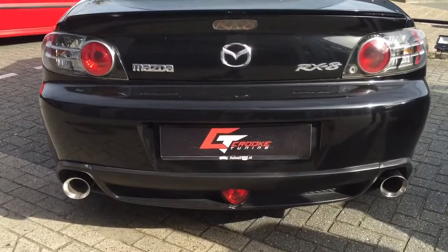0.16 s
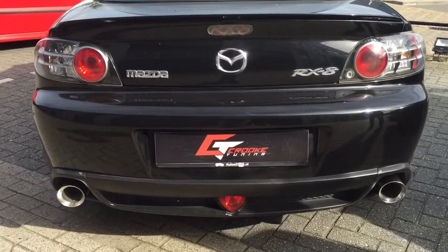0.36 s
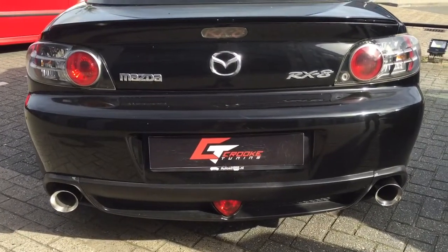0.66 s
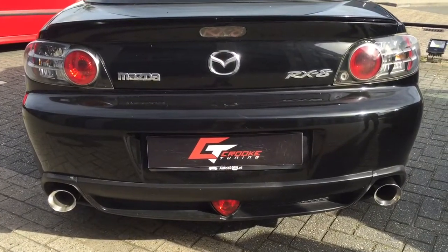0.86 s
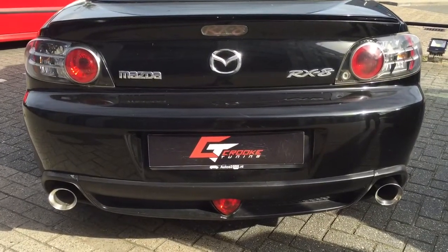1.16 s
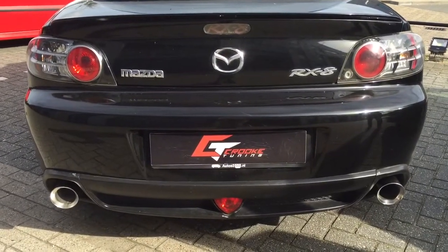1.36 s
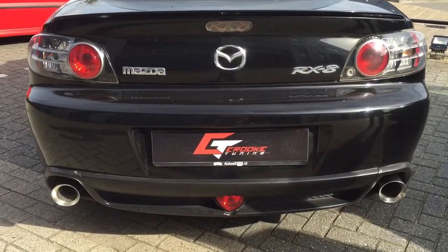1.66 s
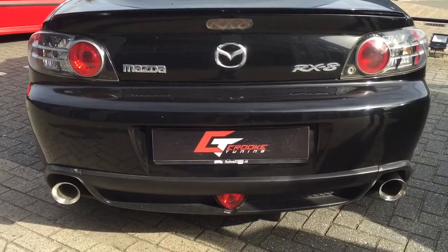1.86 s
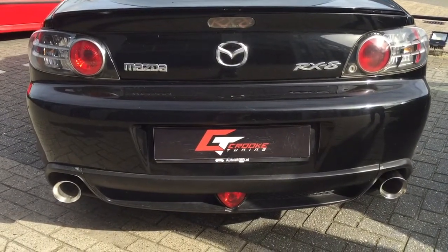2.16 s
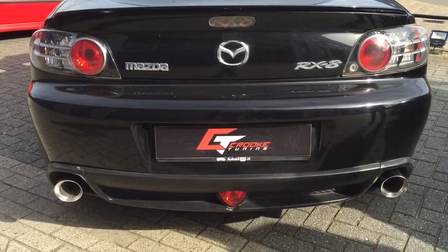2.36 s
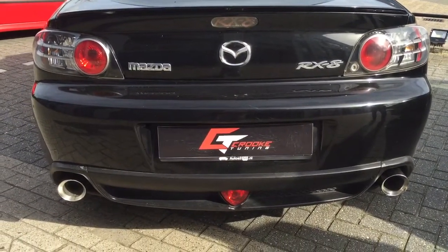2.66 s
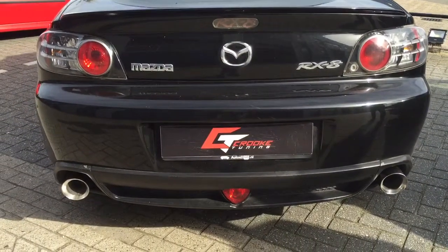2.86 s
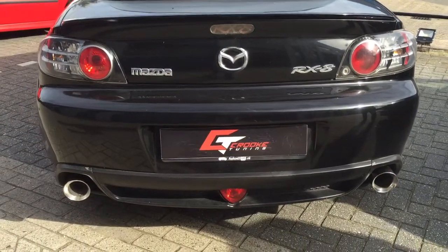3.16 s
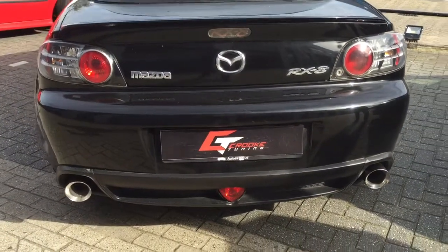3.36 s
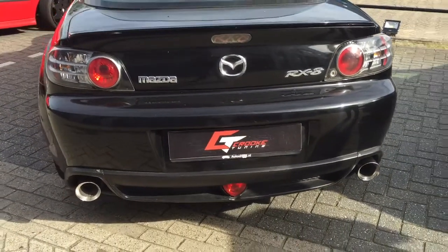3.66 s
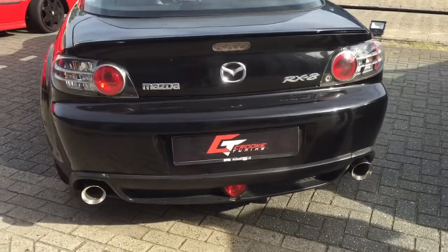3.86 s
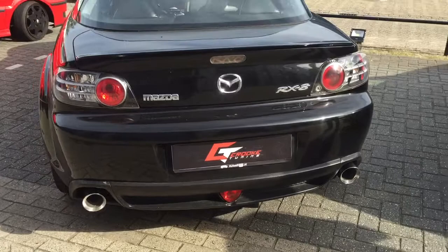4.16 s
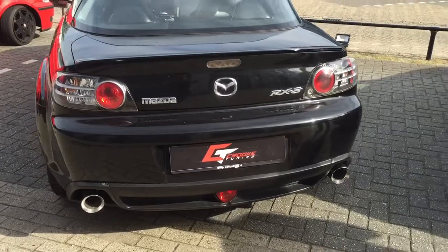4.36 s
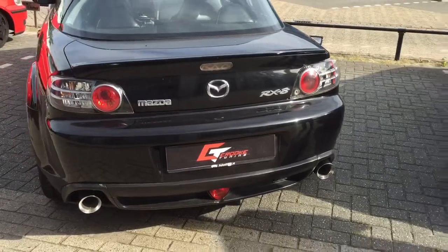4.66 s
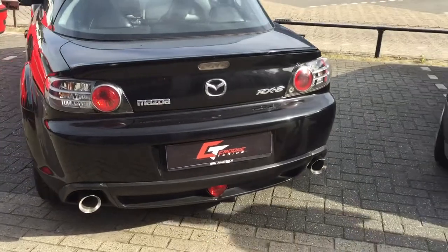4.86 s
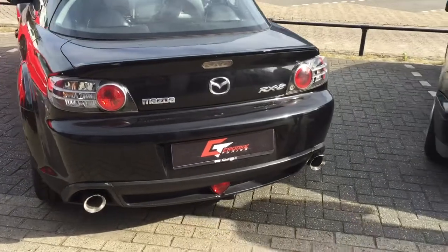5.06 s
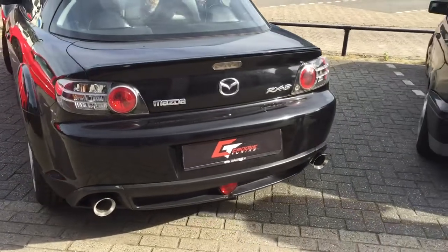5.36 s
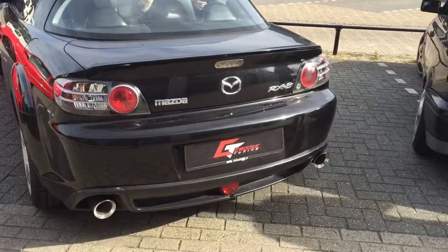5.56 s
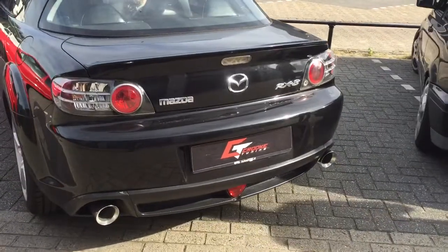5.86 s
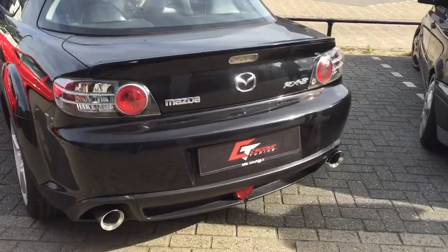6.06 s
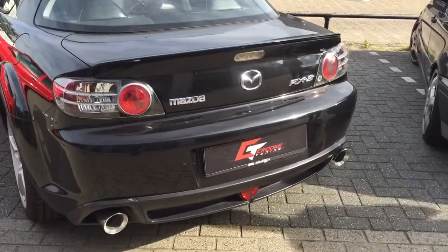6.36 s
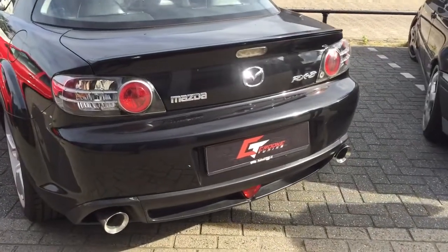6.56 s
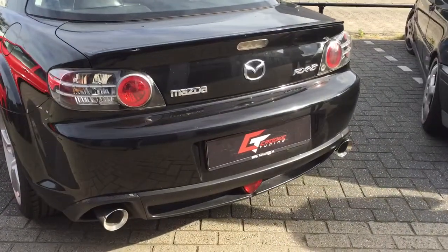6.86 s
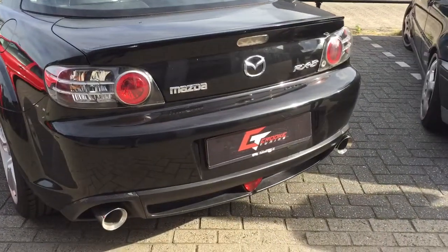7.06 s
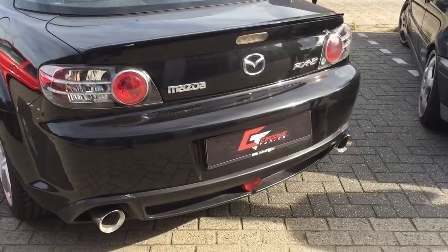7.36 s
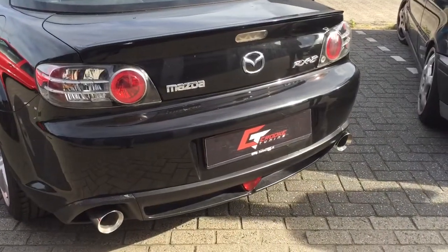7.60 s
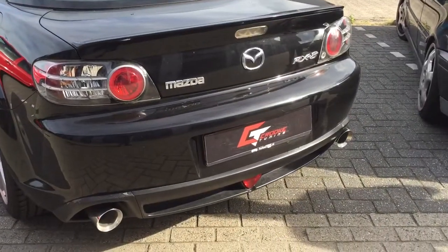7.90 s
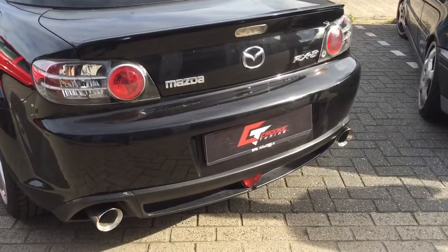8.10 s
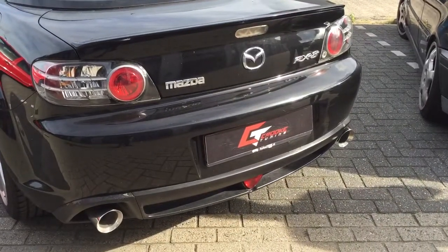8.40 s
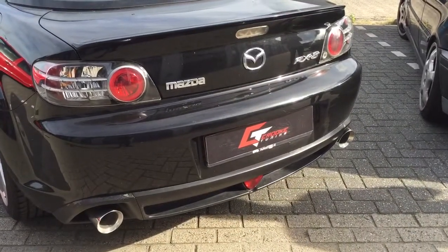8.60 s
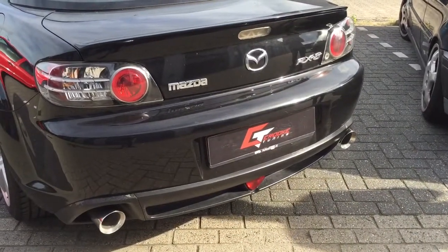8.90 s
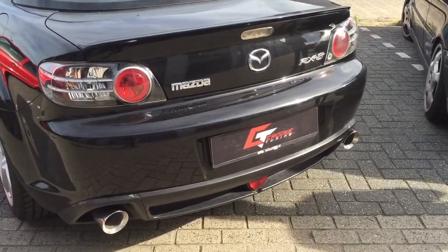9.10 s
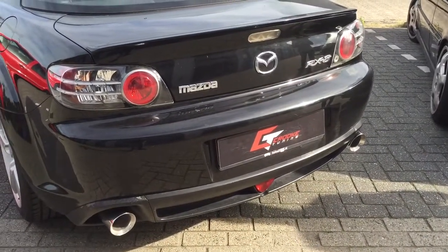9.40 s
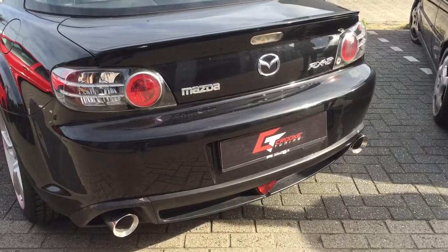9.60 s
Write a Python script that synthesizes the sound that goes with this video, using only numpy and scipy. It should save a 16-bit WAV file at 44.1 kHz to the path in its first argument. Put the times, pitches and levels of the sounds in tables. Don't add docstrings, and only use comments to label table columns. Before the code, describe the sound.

Outdoors on a paved lot, close behind a car's tailpipes. A short noisy burst opens as a rotary engine's boomy hum falls to a low throb by 0.6 s. At 0.9 s the throttle snaps open and the pitch leaps into a hard, rasping buzz until 1.6 s, with hiss and soft thuds on release. A sharp pop at 2.0 s starts a second, higher blip, peaking near 2.3 s, followed by muffled thuds. Revs slide down from 2.5 to 4.7 s with flickering pulley whine and metallic clatter. From 4.7 to 6.5 s it idles, low and lumpy, with fine ticks, gritty puffs and tiny dry creaks. A gentler pull climbs from 6.5 to 8.3 s, growling then brighter; it cuts with a low thud at 8.4 s and falls. At 9.7 s a very loud, distorted pop crackles as the throttle reopens. Brief echoes and faint open-air wash surround it.

```python
import sys
import numpy as np
from scipy import signal
from scipy.io import wavfile
from scipy.ndimage import uniform_filter1d

SR = 44100
rng = np.random.default_rng(int(sys.argv[2]) if len(sys.argv) > 2 else 0)


def natural_amplitude(level_db):
    exponent = np.asarray(level_db, float) / 20
    return 10 ** exponent


def transcribe(signal):
    frames = np.atleast_2d(signal).T
    limited = np.clip(frames, -1, 1)
    pcm = np.round(limited * 32767).astype(np.int16)
    wavfile.write(sys.argv[1], SR, pcm)


N = 429513
STEP = 64

# pitch in Hz, width in Hz, level in dB.
PIPE_MODES = [(463, 320, -1), (604.5, 124, 6), (807, 356, 3), (1014, 310, -3), (1390, 450, -14.5),
              (1960, 250, -20)]


def evened(x):
    return x / np.sqrt(np.mean(x ** 2) + 1e-20)


def read(points, hz):
    f, value = np.transpose(points)
    return np.interp(np.log(hz + 1), np.log(f + 1), value)


def play(rows):
    s, *columns = np.transpose(rows)
    return [np.interp(np.arange(N) / SR, s, c) for c in columns]


def fill(v):
    return np.interp(np.arange(N), np.arange(0, N, STEP), v)


def add(mix, s, sound):
    part = mix[round(s * SR):][:len(sound)]
    part += sound[:len(part)]


def resonate(x, hz, width):
    r = np.exp(-np.pi * width / SR)
    pole = r * np.exp(2j * np.pi * hz / SR)
    return 2 * signal.lfilter([(1 - r) ** 2], [1, -2 * pole, pole ** 2], x).real


def tuned(hz, centre_hz, width):
    return (1 + (2 * (hz - centre_hz) / width) ** 2) ** -2.


def drift(per_s):
    knots = uniform_filter1d(rng.standard_normal(1000), size=2)
    return evened(np.interp(np.arange(N) / SR * per_s, np.arange(1000), knots))


def noise(spectrum, patchy_db):
    a, b, patches = rng.standard_normal((N // 256 + 5, 513, 3)).T
    patches = uniform_filter1d(patches, size=12, axis=1)
    patches = evened(uniform_filter1d(patches, size=8, axis=0))
    colour_db = read(spectrum, np.fft.rfftfreq(1024, 1 / SR))[:, None]
    gain = natural_amplitude(colour_db + patchy_db * patches)
    return evened(signal.istft((a + 1j * b) * gain, nperseg=1024, noverlap=768)[1][:N])


def driver():
    # time in seconds, firings per second.
    speed = [(0, 69.8), (.6, 43.9), (.92, 42.8), (1.01, 51.7), (1.58, 181), (2.015, 152.7), (2.285, 210),
             (3.36, 123.7), (4.0, 82.4), (4.66, 38.9), (5.75, 33.3), (6.53, 37), (6.93, 73.5),
             (7.49, 102.3), (7.83, 136), (8.29, 165), (9.0, 124.2), (9.68, 88.2)]
    # down in seconds, up in seconds, opening at start 0-1, opening at end 0-1.
    strokes = [(0.904, 0.996, 0.33, 0.76), (0.998, 1.301, 0.71, 0.9), (1.299, 1.582, 1, 0.86),
               (2.001, 2.122, 0.74, 0.99), (2.119, 2.291, 0.98, 0.85), (6.5, 6.752, 0.08, 0.29),
               (6.758, 6.92, 0.38, 0.26), (6.91, 7.452, 0.27, 0.42), (7.455, 7.817, 0.48, 0.82),
               (7.816, 8.277, 0.71, 0.38), (9.689, 9.9, 0.87, 0.92)]
    # peak in seconds, level in dB, onset in seconds, recovery in seconds.
    cuts = [
        (.66, -4.5, 0.075, 0.044),
        (1.601, -4, 0.017, .8),
        (2.33, -2, 0.086, 0.32),
        (7.1, -3.5, 0.21, 0.23),
        (8.319, -11, 0.084, 0.043),
        (8.55, 3, 0.074, 0.27),
        (6.35, 4, .15, 0.12),
        (9.675, -3.5, 0.039, 0.023),
    ]
    pedal_lag_s, flywheel_s = 0.014, 0.046
    t = np.arange(N) / SR
    hz = uniform_filter1d(play(speed)[0], size=round(flywheel_s * SR), mode="nearest")
    pedal = np.zeros(N)
    for down, up, first, last in strokes:
        opening = first + (last - first) * (t - down) / (up - down)
        pedal += (t >= down) * (t < up) * opening
    cut_db = np.zeros(N)
    for s, db, onset, recovery in cuts:
        cut_db += db * np.exp(-((t - s) / np.where(t < s, onset, recovery)) ** 2)
    return hz, uniform_filter1d(pedal, size=round(pedal_lag_s * SR)), cut_db


def snap_of(hz):
    hard_blip = 105
    gas_lag_s = .02
    pickup = uniform_filter1d(np.gradient(hz) * SR, size=6000, origin=round(gas_lag_s * SR))
    return uniform_filter1d(np.clip(pickup / hard_blip - 1, 0, .5) * 2, size=3000)


def orders(hz, throttle, cut_db, view_db):
    # pitch in Hz, width in Hz, coasting dB, full throttle dB.
    standing = [(58, 24, -19.5, -10), (98, 29, -17.5, -11), (132, 53, -20, -13.5), (167.4, 35.4, -19.5, -9),
                (209.5, 76, -45, -22), (308, 150, -38.5, -24), (402.3, 69, -39.5, -27),
                (488, 38, -44.5, -24.5), (584, 150, -48, -26.5), (720, 85, -67, -32.5),
                (267, 11, -40.5, -20)]
    # share of the view, level at idle in dB.
    shares = [(0.22, 0), (.2, -7), (0.19, -5), (0.16, 2), (.1, 0), (-0.24, 0), (-.2, 1.5), (.3, 0),
              (0.31, 0), (.2, 0), (.1, 1)]
    late_hz = 900
    idle = np.clip((44.8 - hz) / 12.3, 0, 1)
    pulse_db = cut_db - 20 * idle

    slow_hz, slow_idle, slow_view = hz[::STEP], idle[::STEP], view_db[::STEP]
    pull = np.clip(throttle[::STEP], 0, 2)
    waves = []
    for (f, width, coast_db, full_db), (view_share, idle_db) in zip(standing, shares):
        wave_db = coast_db + (full_db - coast_db) * pull ** (1 + f / late_hz)
        wave_db = wave_db + view_share * slow_view + idle_db * slow_idle
        waves.append((f, width, natural_amplitude(2 * wave_db)))
    on_pipe = []
    for k in range(1, 13):
        power = sum(p * tuned(k * slow_hz, f, width) for f, width, p in waves)
        on_pipe.append(pulse_db + 1.5 * k * idle + fill(10 * np.log10(power)))

    gentle = 2 * throttle * (1 - snap_of(hz)) * np.log2(np.maximum(hz / 100, 1))
    second_db = on_pipe[1] - 4.5 + 3.5 * throttle - 1.5 * gentle
    light = (throttle > 0) * np.clip(1 - 2 * throttle, 0, 1)
    rounding_db = np.outer(-2 * np.arange(10), light)
    higher_db = np.array(on_pipe[2:]) - 9 + 7 * throttle + 4.5 * gentle + rounding_db
    return on_pipe[0], second_db, higher_db


def boom(turns, hz, first_db, second_db, higher_db, crack_db):
    # multiple of firing rate, dB under the first order.
    uneven = [(.5, -28.5), (1.5, -34), (2.5, -37), (3.5, -54)]
    waver_db = np.minimum(1 + 110 / hz, 2.4)
    faces = 1 + 0.07 * np.cos(2 * np.pi * turns / 6) + 0.1 * np.cos(2 * np.pi * turns / 12)
    lean = 3.6
    out = natural_amplitude(first_db + 0.4 * drift(5.9)) * faces * np.cos(2 * np.pi * turns)
    out += natural_amplitude(second_db + 0.64 * waver_db * drift(20)) * np.cos(4 * np.pi * turns + lean)
    load_db = 0.11 * np.maximum(crack_db + 49.0, 0)
    for k in range(3, 13):
        db = higher_db[k - 3] - 2.4 * (k - 3) + load_db * (k > 3) + 1.4 * load_db * (k == 4)
        level = natural_amplitude(db + 1.23 * waver_db * drift(25))
        out += level * np.cos(2 * np.pi * k * turns + lean * (k - 1))
    strongest_db = np.maximum(first_db, second_db + 10.5)
    for k, db in uneven:
        out += natural_amplitude(strongest_db + db + 3.0 * drift(5.2)) * np.cos(2 * np.pi * k * turns + k)
    lumps_db = 1.3 * np.clip((44 - hz) / 6, 0, 1) * drift(28)
    return np.sqrt(2) * natural_amplitude(lumps_db) * out


def layers(hz, throttle, cut_db, view_db):
    # peak in seconds, length in seconds, crack in dB, hiss in dB.
    gust_rows = [
        (0, 0.012, 27, 9),
        (0.966, 0.055, -2.5, 6.5),
        (7.205, 0.3, -3.5, -2),
        (2.764, .1, 1, 0.5),
        (3.636, 0.11, 8.5, 1.5),
        (4.92, 0.017, 4, 6.5),
        (5.276, 0.11, 12.5, -2),
        (5.809, 0.018, 11, 5),
        (8.397, 0.022, 12, 2.5),
    ]
    t = np.arange(N) / SR
    octaves = np.log2(np.minimum(hz, 122.5) / 100)

    def follow(coasting_db, per_octave, full_throttle, view_share, cut_share):
        engine_db = coasting_db + per_octave * octaves + full_throttle * throttle
        return engine_db + view_share * view_db + cut_share * cut_db

    crack_db = follow(-48.5, per_octave=6, full_throttle=28, view_share=0.94, cut_share=-0.75)
    clatter_db = follow(-48, per_octave=2.5, full_throttle=4, view_share=1.41, cut_share=0.26)
    hiss_db = follow(-56, per_octave=5.5, full_throttle=-1.5, view_share=0.85, cut_share=-0.17)
    for s, length, crack_gust, hiss_gust in gust_rows:
        swell = np.exp(-((t - s) / length) ** 2)
        crack_db = crack_db + crack_gust * swell
        hiss_db = hiss_db + hiss_gust * swell
    return crack_db, clatter_db, hiss_db + 5 * snap_of(hz)


def ring_pipe(x, dull_db=0):
    out = 0
    for k, (f, width, db) in enumerate(PIPE_MODES):
        out = out + (-1) ** k * natural_amplitude(db + dull_db * (f > 700)) * resonate(x, f, width)
    return evened(out)


def crack(turns, hz, crack_db):
    rise_s = .002
    firing = np.floor(turns + .5 + rise_s * hz).astype(int)
    weak_db = -np.clip(.16 * (hz - 85), 0, 13) * (firing % 2)
    size_db = 2 * rng.standard_normal(2000)[firing]
    pulses = -np.diff(firing, prepend=0) * natural_amplitude(weak_db + size_db) * np.sqrt(SR / hz)
    flow = rng.standard_normal(N)
    pickup = uniform_filter1d(np.gradient(hz) * SR, size=2000)
    dull_db = -9 * np.clip(np.maximum(1 - pickup / 210, (85 - hz) / 30), 0, 1)
    rings, rush = ring_pipe(pulses, dull_db), ring_pipe(flow, dull_db)

    load = natural_amplitude(-1.1 * np.maximum(-39 - crack_db, 0) - 3 * np.maximum(47 - hz, 0))
    pull = np.clip(pickup / 90, 0, 1)
    puffs = flow * np.exp(-((turns + .5) % 1) / 0.63)
    growl_gain = pull * load * natural_amplitude(10.5 - 0.43 * np.maximum(hz - 55, 0))
    growl = growl_gain * evened(resonate(puffs, 320, 180))
    rough = 1 - .85 * load
    return natural_amplitude(crack_db) * (natural_amplitude(-3) * load * rings + natural_amplitude(-2) * rough * rush + growl)


def gas_hiss(turns, hz, hiss_db):
    # pitch in Hz, level in dB per Hz.
    hiss_colour = [(880, -34.5), (1500, -27.5), (2110, 13), (2280, 0), (2450, 6.5), (3030, 1), (4900, -6),
                   (6320, -9.5), (10500, -22), (11700, -17.5), (15600, -23)]
    gate = 0.7 + 0.37 * np.exp(-((turns + .5) % 1) / 0.39)
    gas = noise(hiss_colour, patchy_db=.8)
    fizz = snap_of(hz) * signal.lfilter([1, -1], [1], gas)
    level_db = hiss_db + 9.5 - 1.0 * np.maximum(-55.5 - hiss_db, 0)
    return natural_amplitude(level_db) * gate * (gas + fizz)


def pops():
    # start in seconds, thud in dB, thud in Hz, crack in dB,
    # time to fade by 60 dB in seconds.
    open_pops = [
        (2.0006, -3.5, 153, -18, 0.09),
        (9.696, 1.5, 98, -20.5, 0.067),
        (9.704, -16.5, 94, -13.5, 0.093),
    ]
    # start in seconds, thud in dB, thud in Hz,
    # time to fade by 60 dB in seconds.
    muffled = [
        (1.606, -19, 111.3, 0.11),
        (1.637, -20, 78, 0.056),
        (2.292, -19.5, 71, 0.21),
        (2.446, -10, 91.05, 0.053),
        (2.471, -26, 60, 0.079),
        (5.545, -21, 57, 0.12),
        (8.41, -8, 70.4, 0.062),
    ]
    out, t = np.zeros(N), np.arange(8000) / SR
    for s, thud_db, hz, *_, t60 in open_pops + muffled:
        tone = np.sin(2 * np.pi * hz * t) + 0.3 * np.sin(2 * np.pi * 2.41 * hz * t)
        add(out, s, natural_amplitude(thud_db - 60 * t / t60) * tone * np.minimum(t / .004, 1))
    for s, _, _, crack_db, t60 in open_pops:
        grit = rng.standard_normal(len(t))
        snap = grit + 22 * (t == 0)
        ragged = natural_amplitude(crack_db - 60 * t / (0.62 * t60)) * ring_pipe(snap)
        burst = np.exp(-(t / .016) ** 4) * np.minimum(t / .003, 1)
        puff = natural_amplitude(-37) * burst * evened(resonate(grit, 1800, 8700))
        add(out, s, puff + ragged)
    return out


def clatter(turns, hz):
    # pitch in Hz, level in dB per Hz.
    clatter_colour = [(150, -19), (250, 3.5), (372, -3), (413, 2.5), (507, -18.5), (692, -0.5), (1250, -3),
                      (1560, -3.5), (1790, -5), (2400, -7.5), (2900, -19.5), (3280, -14.5), (7250, -37),
                      (9720, -37.5), (15500, -48.5)]
    # pitch in Hz, width in Hz, dB over the clatter.
    covers = [(1491, 60, -11), (2396, 30, -13), (5310, 120, -23.5), (9870, 400, -25), (11000, 200, -37.5)]
    out = natural_amplitude(3) * noise(clatter_colour, patchy_db=1) * (1 + .15 * np.cos(2 * np.pi * turns))
    shake = rng.standard_normal(N)
    for f, width, db in covers:
        slow_db = 1.0 * np.minimum(hz - 60, 0) * (f > 2000)
        out += natural_amplitude(db + slow_db) * evened(resonate(shake, f, width))
    dark = signal.sosfilt(signal.butter(2, 2700, fs=SR, output="sos"), out)
    bright = signal.sosfilt(signal.butter(2, 2700, "high", fs=SR, output="sos"), out)
    idle = np.clip((55 - hz) / 20, 0, 1)
    return dark - (1 - .45 * idle) * bright


def whines(turns, hz, throttle, view_db):
    # multiple of firing rate, pitch in Hz, width in Hz, dB over the clatter,
    # dB added under light throttle.
    crossings = [(11.87, 2090, 240, 9, -3), (11.87, 1540, 260, 4.5, -24), (11.87, 2400, 200, -4, -20),
                 (17.4, 680, 110, 2, -60), (17.4, 1150, 400, -14, 21), (17.4, 1500, 340, -6, 15),
                 (15.6, 2300, 300, -26, 18)]
    out = np.zeros(N)
    pull = np.minimum(throttle[::STEP] / .25, 1)
    for k in sorted({row[0] for row in crossings}):
        power = 0
        for order, f, width, db, pull_db in crossings:
            if order == k:
                power = power + natural_amplitude(2 * (db + pull_db * pull)) * tuned(k * hz[::STEP], f, width)
        flicker_db, slip = 3 * drift(30), 1.3 * drift(90)
        out += fill(np.sqrt(power)) * natural_amplitude(flicker_db) * np.cos(2 * np.pi * k * turns + slip)
    buried = np.maximum(snap_of(hz), throttle > .9)
    return natural_amplitude(-30 * buried - .35 * view_db) * out


def injector_ticks(turns, hz):
    # pitch in Hz, width in Hz, level in dB.
    tick_modes = [(8300, 700, -82), (12000, 800, -82), (9300, 700, -81), (13000, 800, -81),
                  (10000, 600, -86), (14500, 1000, -82)]
    shake = rng.standard_normal(N)
    chance_db = 2.5 * rng.standard_normal((1000, len(tick_modes)))[(turns / 2).astype(int)]
    out = np.zeros(N)
    for k, (f, width, db) in enumerate(tick_modes):
        since = (turns + k) % 2 / hz
        tick = evened(resonate(np.exp(-since / .016) * shake, f, width))
        out += natural_amplitude(db + 2.5 + chance_db[:, k]) * tick
    return out


def creaks():
    # start in seconds, level in dB, pitch in Hz, width in Hz, time to fade by 60 dB in seconds.
    creak_rows = [
        (4.9, -62.5, 9030, 1500, .1),
        (4.904, -62, 6003, 1500, .12),
        (5.285, -50, 3202, 2000, .1),
        (5.7937, -50.5, 6987, 3500, 0.025),
        (5.816, -65, 7000, 3000, 0.11),
        (6.272, -59.5, 11600, 5000, 0.024),
    ]
    out, t = np.zeros(N), np.arange(4000) / SR
    for s, db, hz, width, t60 in creak_rows:
        burst = resonate(rng.standard_normal(len(t)), hz, width)
        add(out, s, natural_amplitude(db - 60 * t / t60) * evened(burst))
    return out


def echoes(sharp):
    # delay in seconds, level in dB.
    walls = [(.004, -20), (0.009, -16.5), (0.022, -12.5), (.041, -28.5)]
    out = sharp.copy()
    for s, db in walls:
        add(out, s, natural_amplitude(db) * sharp)
    return out


def lot_wash(hz):
    # pitch in Hz, level in dB per Hz.
    lot_colour = [(18, -50), (30, -31.5), (64, 5), (156, 6), (219, -9), (468, -24), (998, -12.5),
                  (1080, -7), (1170, -21), (1560, -30), (2130, -38.5), (2920, -59), (4800, -66),
                  (11700, -57), (15600, -51)]
    duck_db = -3.5 * np.clip(hz / 50 - 1, 0, 1)
    return natural_amplitude(-47.5 + 7.5 + duck_db) * noise(lot_colour, patchy_db=1.6)


def scene():
    # time in seconds, level in dB.
    view = [(0, -2), (.8, 2), (1.6, -7), (2.6, -4.5), (3.5, -0.5), (4.4, -1), (5.2, 1.5), (6.1, -2),
            (7.2, 1.5), (8.3, 4), (9.7, 0.5)]
    hz, throttle, cut_db = driver()
    view_db = play(view)[0]
    turns = np.cumsum(hz) / SR
    first_db, second_db, higher_db = orders(hz, throttle, cut_db, view_db)
    crack_db, clatter_db, hiss_db = layers(hz, throttle, cut_db, view_db)

    low = natural_amplitude(0.18) * boom(turns, hz, first_db, second_db, higher_db, crack_db)
    sharp = crack(turns, hz, crack_db) + pops() + creaks()
    moving_parts = natural_amplitude(clatter_db) * (clatter(turns, hz) + whines(turns, hz, throttle, view_db))
    engine_bay = moving_parts + gas_hiss(turns, hz, hiss_db) + injector_ticks(turns, hz)
    return (low + echoes(sharp) + engine_bay + lot_wash(hz))[None]


def roll_off(x):
    return signal.sosfilt(signal.butter(12, 15710, fs=SR, output="sos"), x)


def record(dry):
    ceiling = .705
    thin = signal.sosfilt(signal.butter(4, 37, "high", fs=SR, output="sos"), dry)
    return roll_off(np.clip(thin, -ceiling, ceiling))


dry = scene()
out = record(dry)
transcribe(out)
```